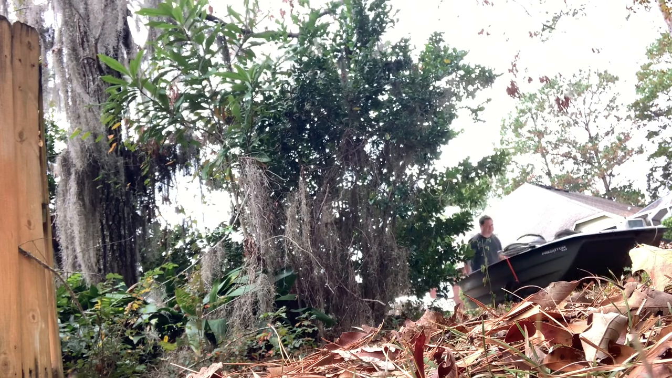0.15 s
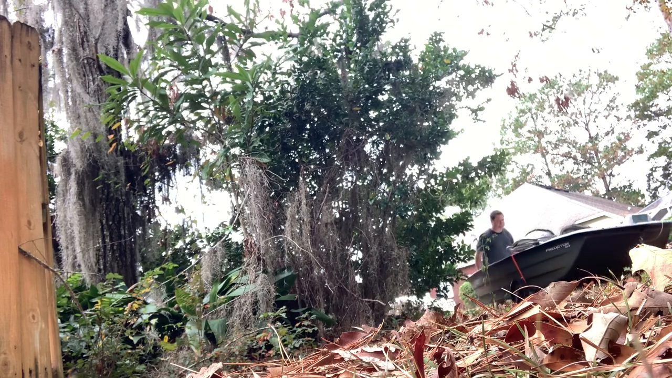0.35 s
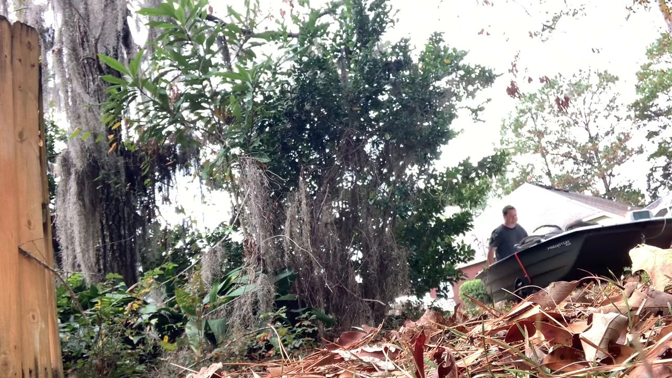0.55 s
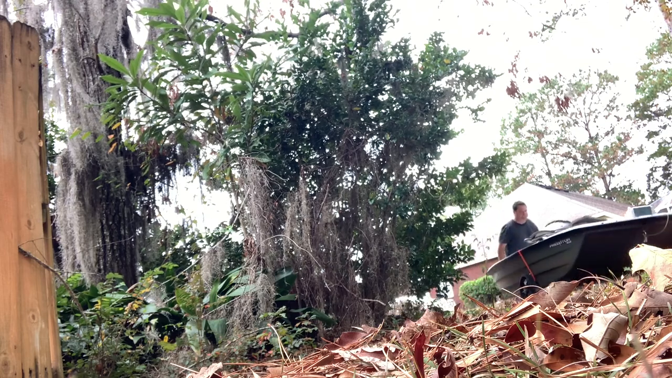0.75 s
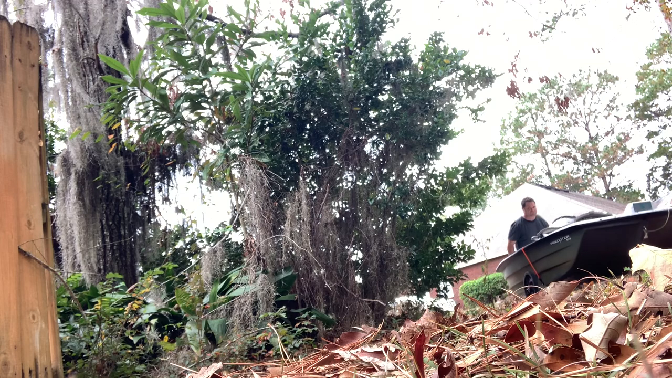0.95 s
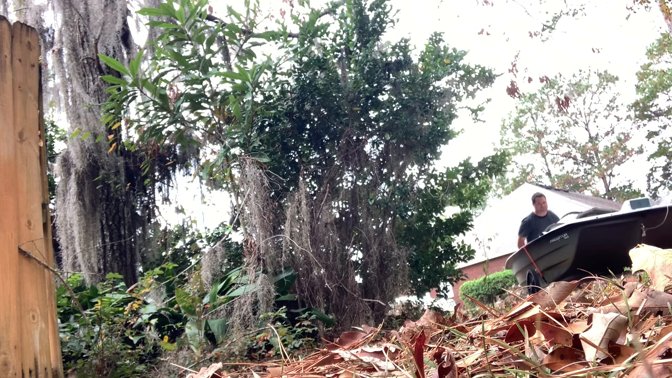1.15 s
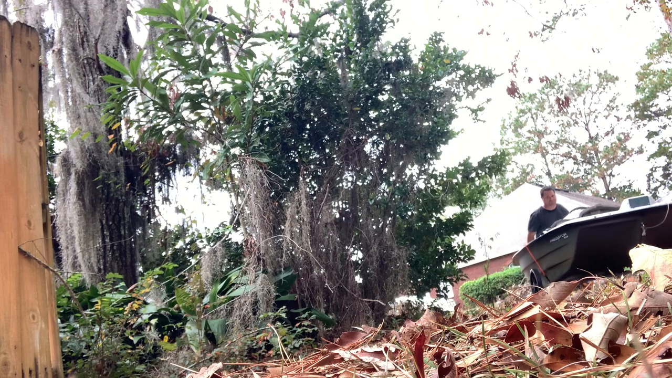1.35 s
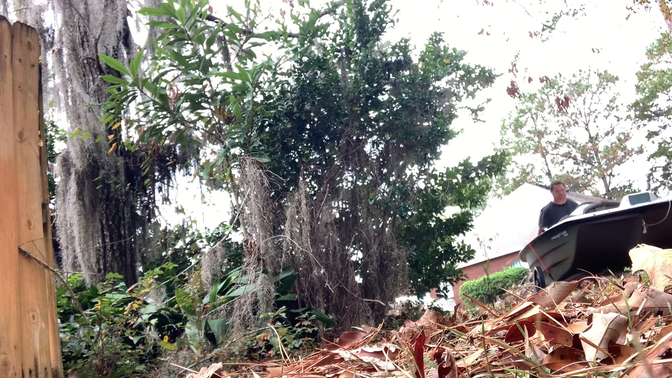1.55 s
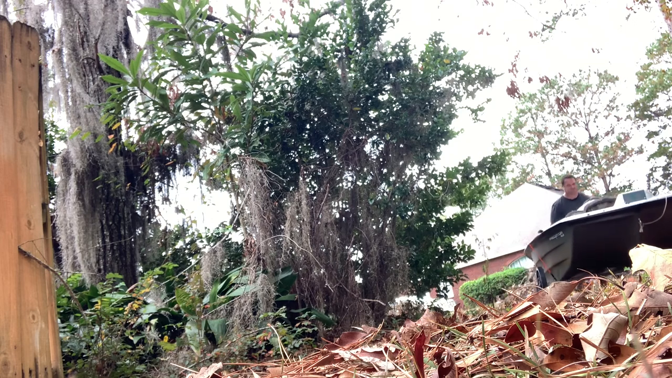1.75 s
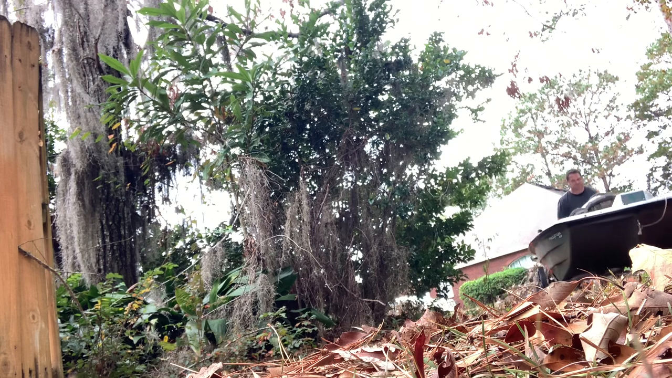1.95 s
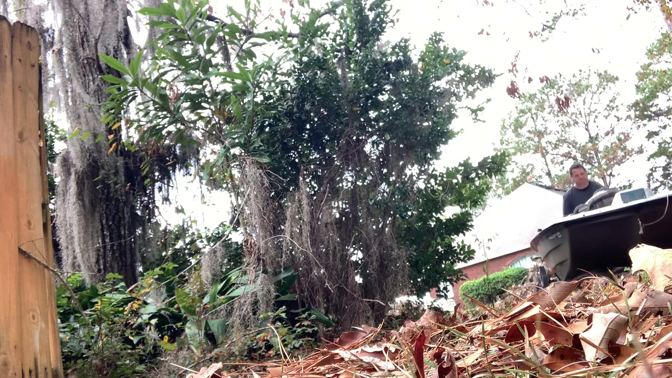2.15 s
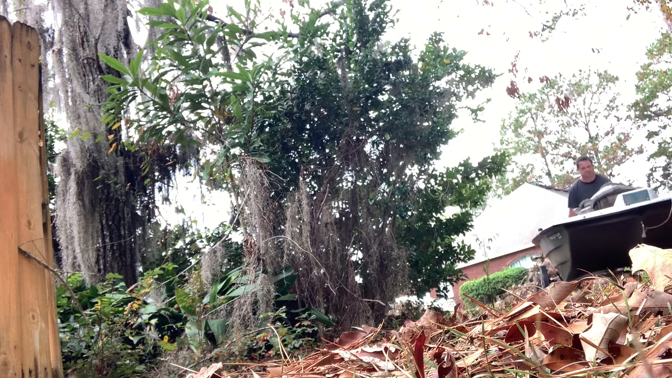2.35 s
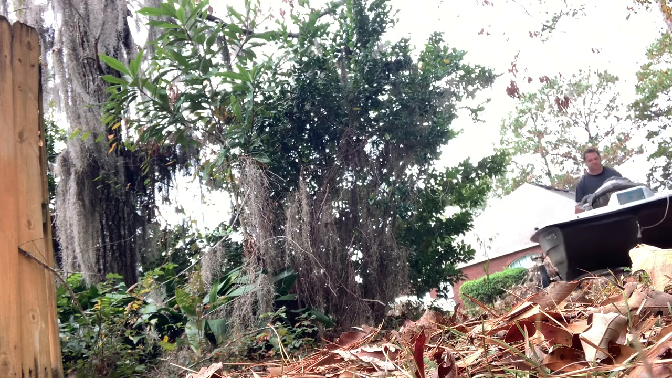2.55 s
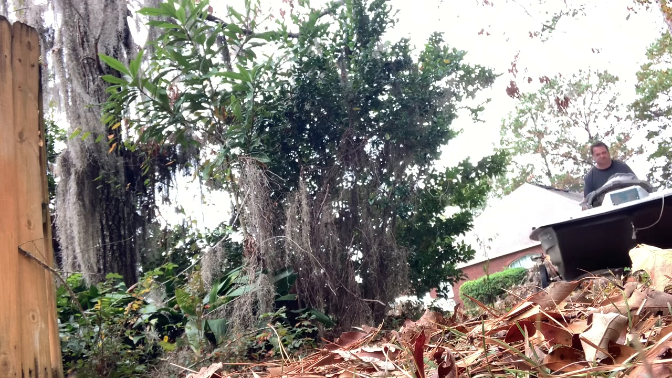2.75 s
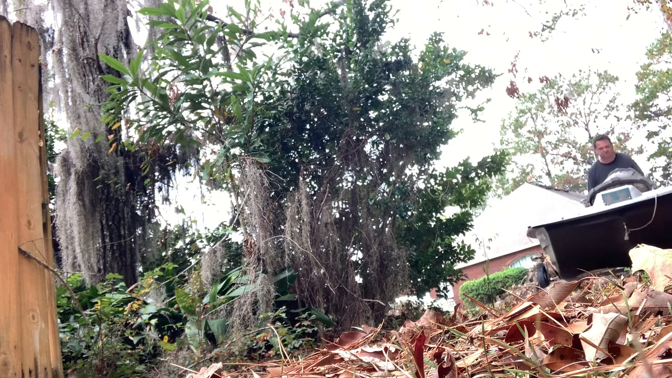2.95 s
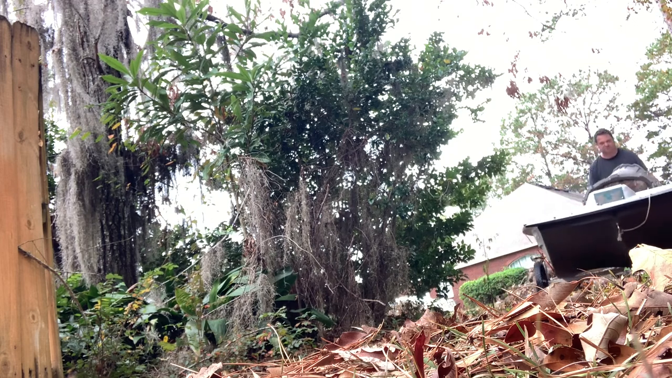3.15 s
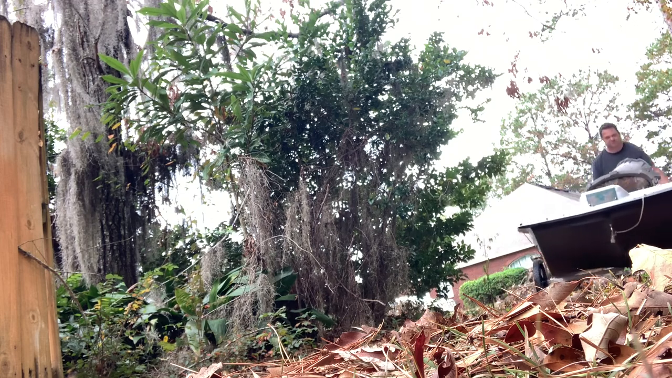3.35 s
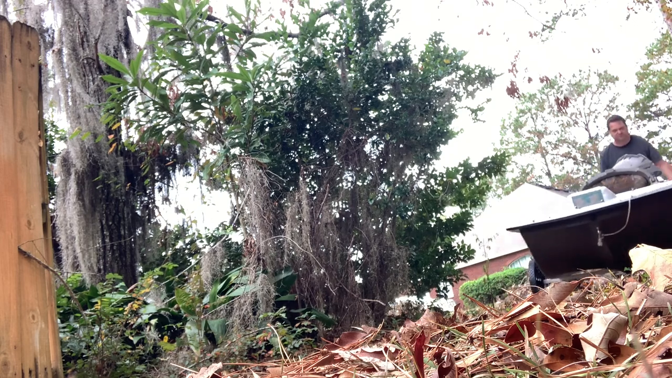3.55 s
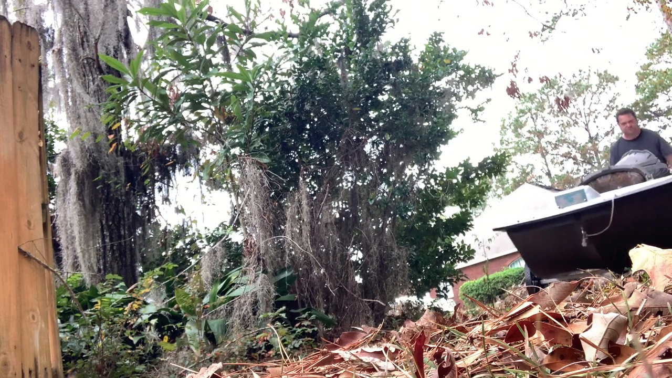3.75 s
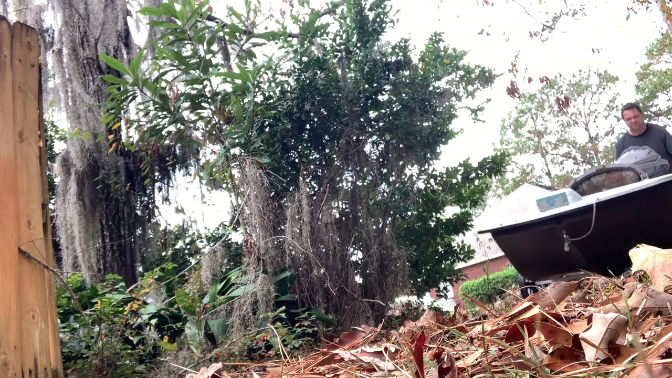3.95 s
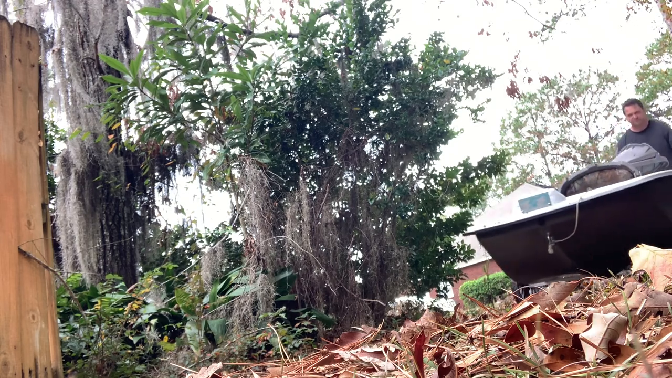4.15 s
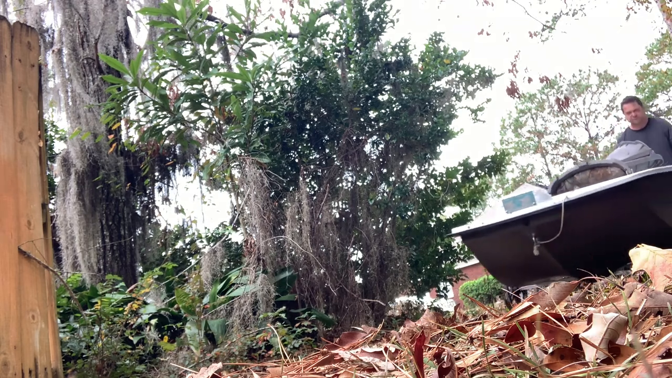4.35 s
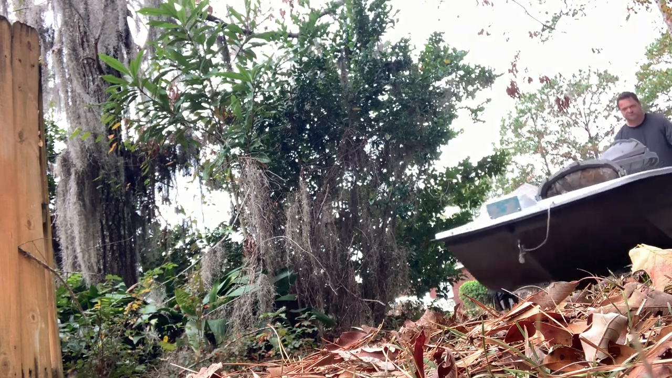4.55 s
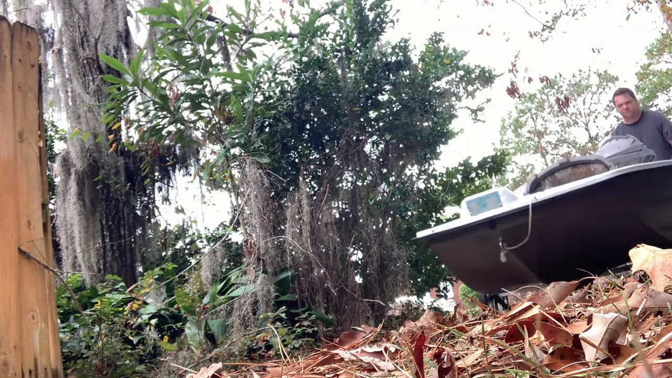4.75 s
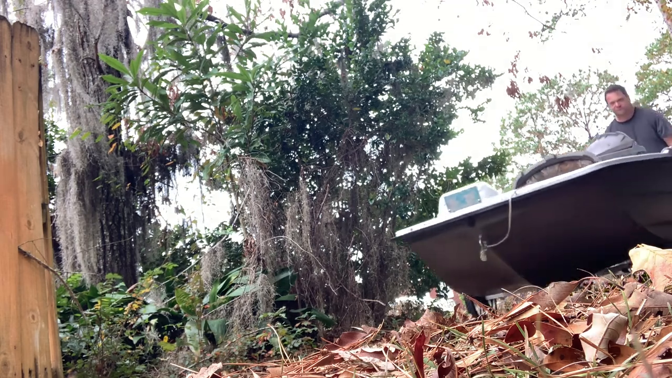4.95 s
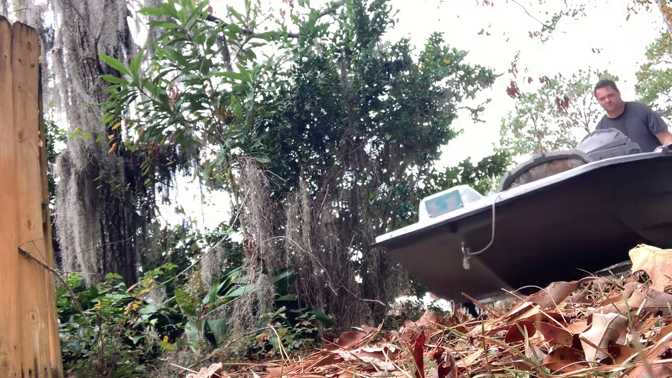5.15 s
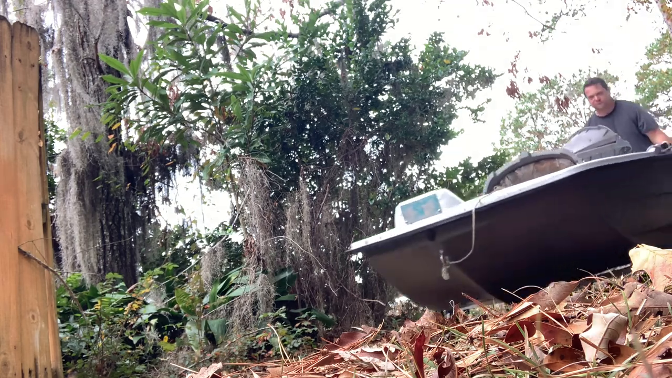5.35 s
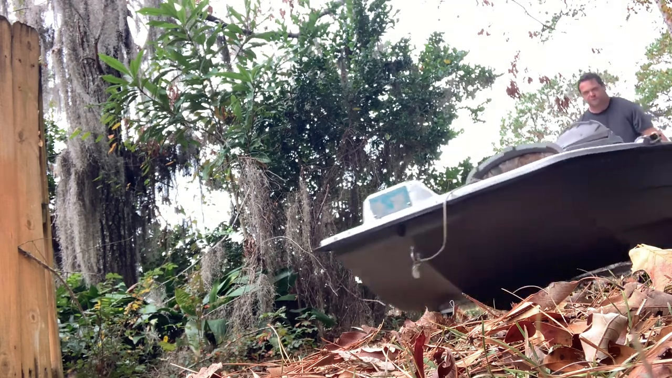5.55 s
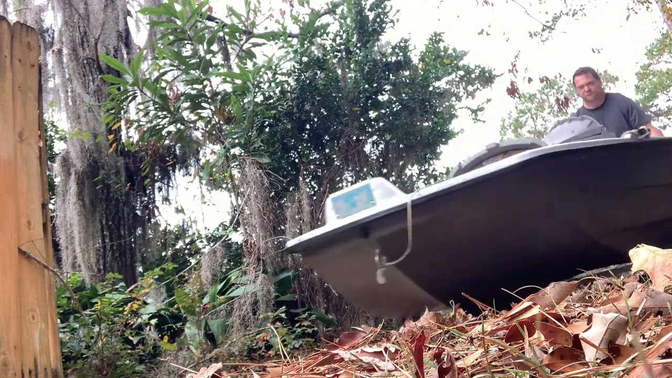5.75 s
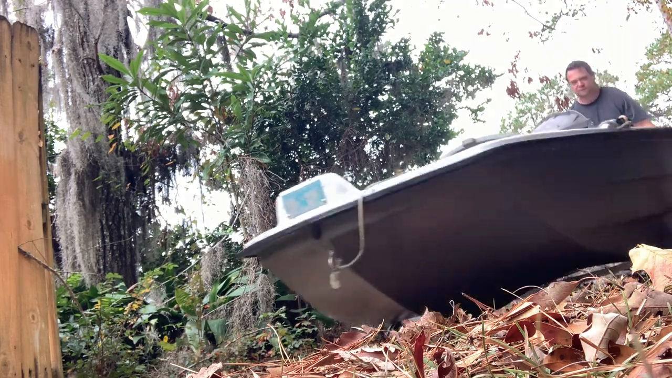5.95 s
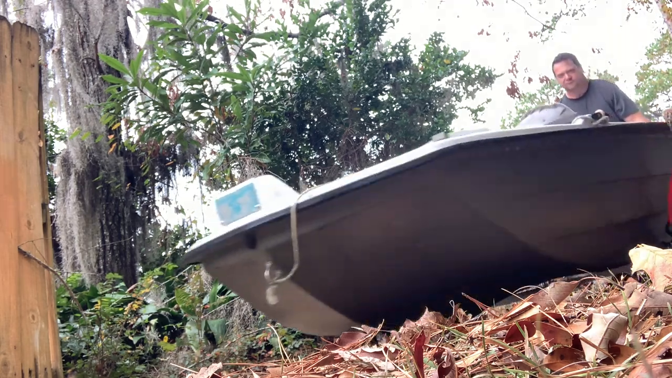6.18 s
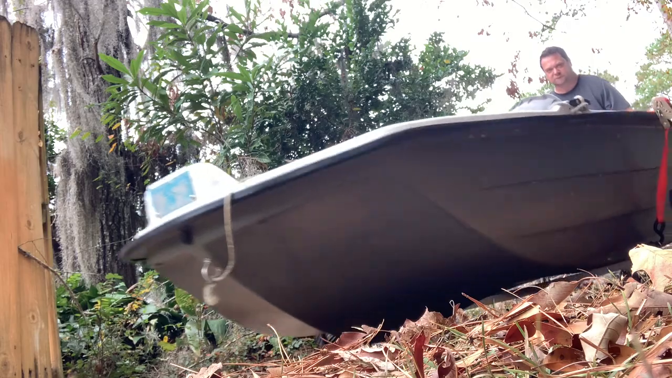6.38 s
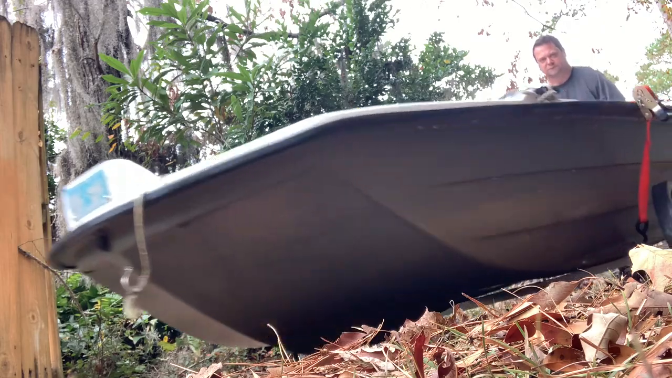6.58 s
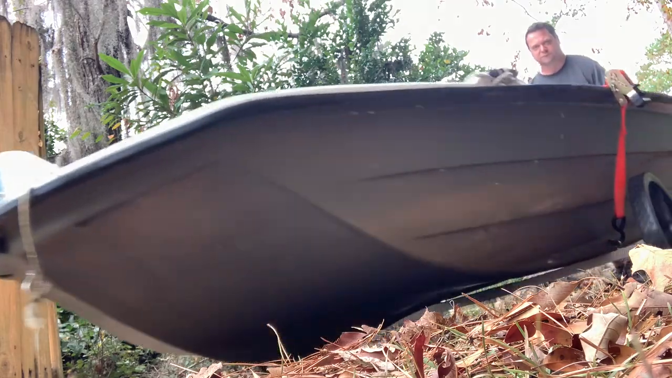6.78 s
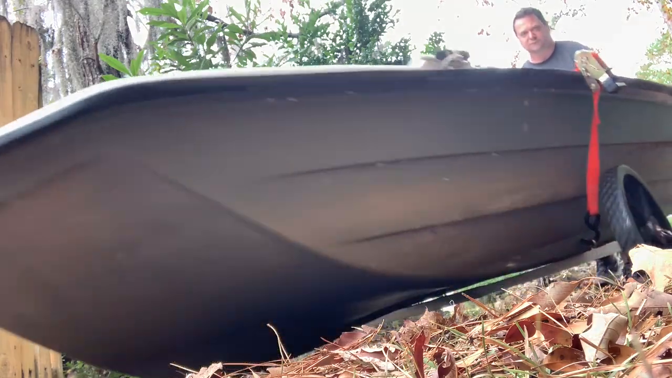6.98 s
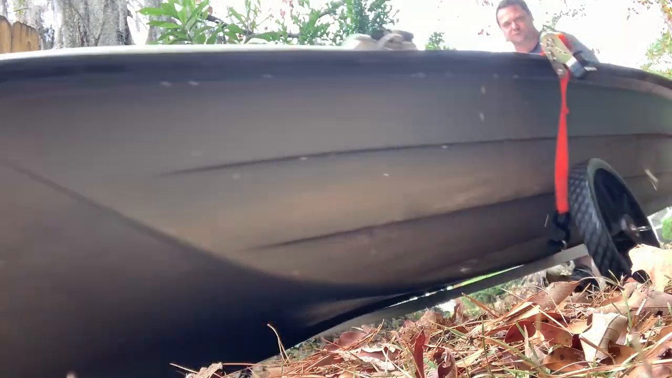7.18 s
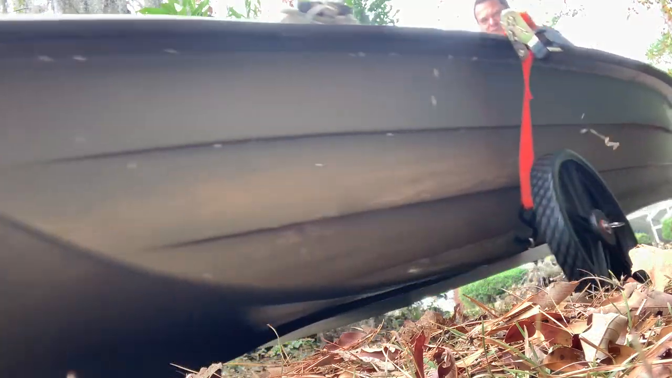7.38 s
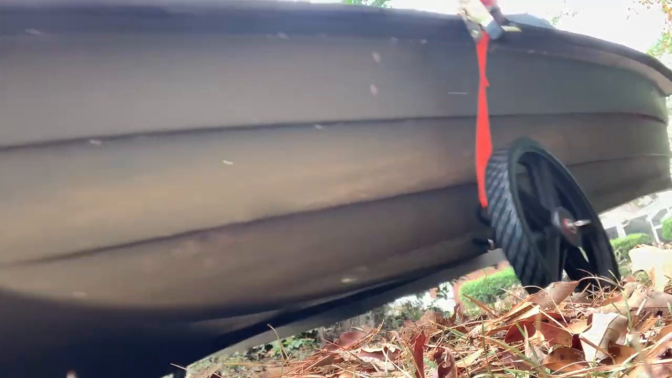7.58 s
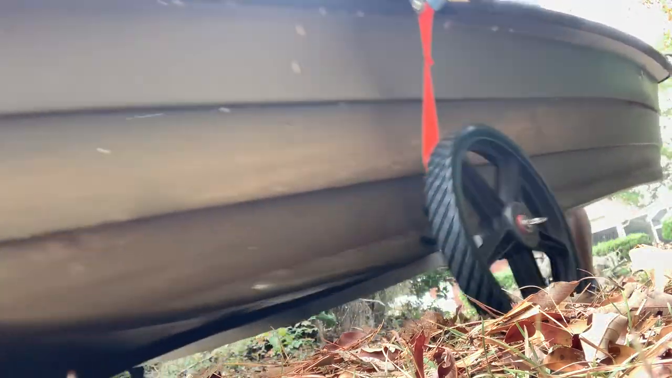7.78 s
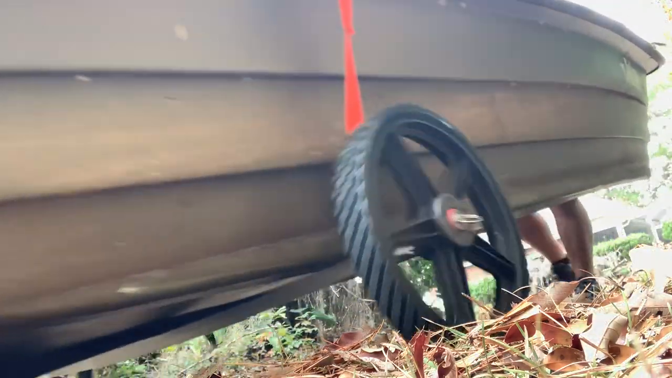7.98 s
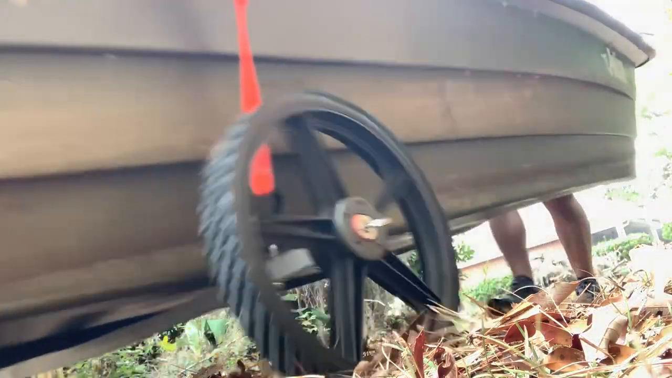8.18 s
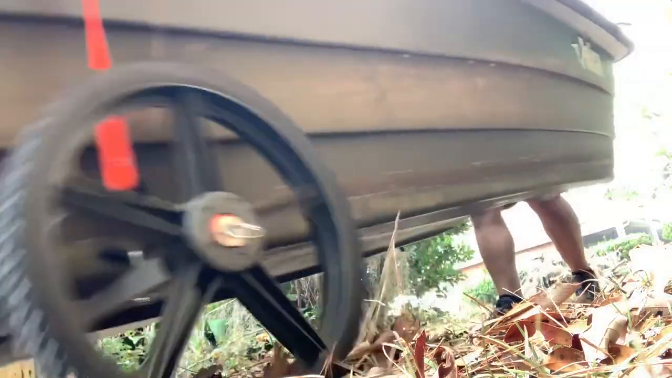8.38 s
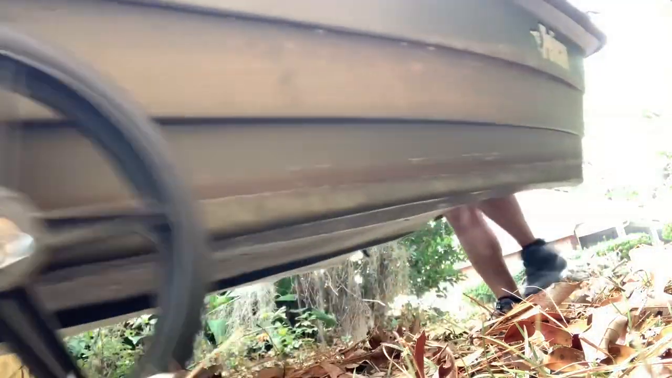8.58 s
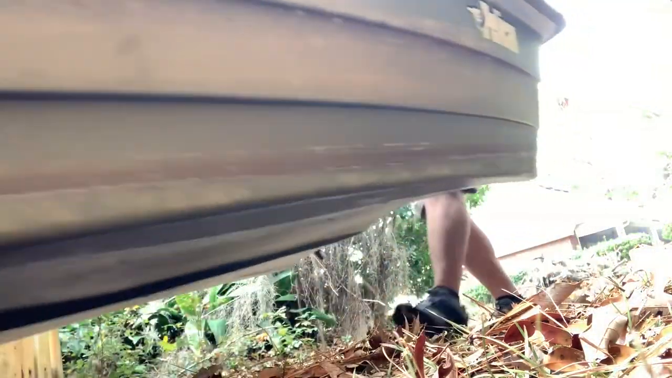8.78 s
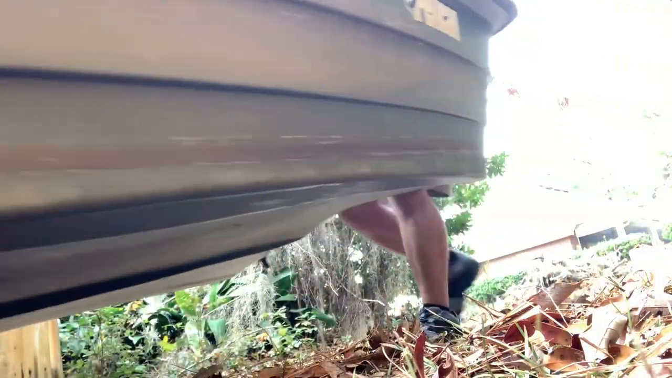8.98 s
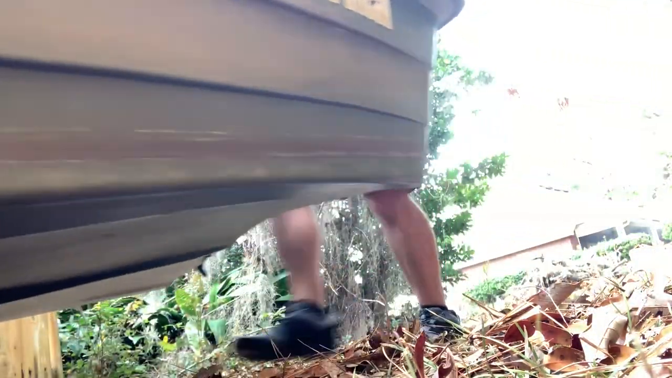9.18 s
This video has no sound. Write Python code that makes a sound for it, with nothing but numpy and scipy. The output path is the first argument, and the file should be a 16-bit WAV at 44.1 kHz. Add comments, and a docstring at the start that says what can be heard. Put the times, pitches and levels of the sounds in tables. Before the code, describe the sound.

Outdoor stereo sound from a microphone on the ground in a backyard, about nine seconds, with a faint low-pitched air background. From 0 to 2 s, distant, sparse leaf rustles and soft dull knocks, barely above the background. At about 2 to 2.8 s a rough patch brings a cluster of rattling knocks, crunches and hollow low booms, then it calms until 4 s. From 4 to 6 s the rolling draws nearer in uneven surges, with crisp crackles, small twig snaps and rumble. From 6 to 7.7 s knocks on the dolly frame grow firm, stalks snap clearly and the hull booms deeply. Between 7.8 and 8.7 s the wheel passes very close: dense loud crunching and sharp bright cracks. From 8.8 s to the end, hard knocks and the heaviest drum-like hull booms dominate as leaf crackle thins.

```python
"""In a backyard, a plastic boat on a two-wheeled dolly is pushed over dry leaves, from afar to right past a
microphone on the ground. Rolling noise, a leaf rustle and a hull rumble, grows unevenly as it nears.
Bursts of filtered noise make crushed leaves; short decaying sines and noise make snapping twigs.
Rough ground shakes the load, and bumps excite decaying modes: knocks in the dolly, booms in the hollow hull."""
import sys
import numpy as np
from scipy import signal
from scipy.fft import rfft, irfft, next_fast_len
from scipy.io import wavfile
from scipy.ndimage import uniform_filter1d

SR = 44100
rng = np.random.default_rng(int(sys.argv[2]) if len(sys.argv) > 2 else 0)


def unload_audio(sound):
    """Save the sound as a 16-bit wav file, at the path given as the first command line argument."""
    columns = np.transpose(np.atleast_2d(sound))
    # keep every value between -1 and 1, then stretch to whole-number steps
    steps = np.round(np.clip(columns, -1, 1) * 32767)
    wavfile.write(sys.argv[1], SR, steps.astype(np.int16))


N = 406602
TIME = np.arange(N) / SR
COARSE_TIME = TIME[::40]   # enough for slow envelopes
SIZE = next_fast_len(N + SR // 2, True) // 2 * 2   # transform length, with room for filter tails
FREQS = np.maximum(np.arange(SIZE // 2 + 1) * SR / SIZE, 1)

# Steady rolling. Each row: time in seconds, relative leaf rustle in dB, relative hull rumble in dB.
ROLLING_LEVELS = [(0, -69.5, -50), (1.3, -71, -53), (2.0, -61, -45.5), (3.0, -68, -52), (3.75, -67, -53.5),
                  (4.3, -60, -50.5), (5.05, -55.5, -52.5), (5.5, -58.5, -41.5), (6.1, -50, -42),
                  (6.9, -45.5, -47), (7.45, -54.5, -39.5), (8.0, -47.5, -39.5), (8.75, -44, -37.5),
                  (9.22, -52.5, -34)]
# Stretches of rough ground under the wheels. Each row: start in seconds, hold in seconds,
# relative hull rumble in dB, relative dolly rattle in dB.
ROUGH_STRETCHES = [(0.724, 0.14, -56, -61.5), (1.99, 0.56, -38.5, -57), (2.617, 0.078, -44, -52),
                   (2.768, 0.083, -49, -56.5), (4.029, 0.16, -44, -66), (4.514, 0.27, -40.5, -58),
                   (5.344, 0.14, -45, -54.5), (5.572, 0.3, -41, -52), (6.202, 0.4, -36.5, -49.5),
                   (6.533, 0.33, -44.5, -52.5), (7.094, 0.17, -36, -53), (7.507, 0.39, -36.5, -52.5),
                   (8.219, 0.06, -25.5, -60), (8.33, 0.32, -31, -55), (8.761, 0.52, -28.5, -46.5)]
# Spectrum of thin, brittle leaf matter. Each row: frequency in Hz, relative density in dB per Hz.
RUSTLE_SPECTRUM = [(2500, -15), (5000, -10.5), (7000, -3.5), (8000, -11), (8800, 2.5), (10500, -1),
                   (12500, -2), (14500, -14), (15800, -10)]
# Spectrum of breaking wood. Each row: frequency in Hz, relative density in dB per Hz.
TWIG_SPECTRUM = [(500, -25), (1100, -30), (1800, -4), (2450, -4), (3300, 9.5), (4300, 12.5), (5000, 1),
                 (6100, 2.5), (7300, 11), (10000, -9), (16000, -22)]
# Spectrum of the dull litter on the ground. Each row: frequency in Hz, relative density in dB per Hz.
LITTER_SPECTRUM = [(200, -27.5), (380, 6), (700, 8), (1000, 1), (1350, 2.5), (1900, -9.5), (3000, -21.5),
                   (6000, -14)]


def from_db(db):
    """Amplitude gain is ten to the power of a twentieth of the level in decibels."""
    return 10 ** (np.asarray(db) / 20)


def rms_one(x):
    """Normalization: division by the root mean square gives unit power."""
    return x / np.sqrt(np.mean(x ** 2) + 1e-20)


def in_time(rows):
    """Linear interpolation: each column of a breakpoint curve at every sample."""
    s, *columns = np.transpose(rows)
    return [np.interp(TIME, s, column) for column in columns]


def over_hz(points):
    """Linear interpolation of a table along a logarithmic frequency axis."""
    hz, values = np.transpose(points)
    return np.interp(np.log(FREQS), np.log(hz), values)


def drift(rate):
    """Random modulation of unit rms: `rate` values a second, joined by lines; the 4096th value then holds."""
    return rms_one(np.interp(TIME * rate, np.arange(4096), rng.standard_normal(4096)))


def fade(energy, t60):
    """Exponential decay: each impulse of energy falls by 60 dB in t60 seconds."""
    return signal.lfilter([1], [1, -from_db(-120 / (t60 * SR))], energy + 1e-24)


def noise_burst(energy, spectrum):
    """Modulated noise through a minimum-phase filter, with a partial coherence between two channels."""
    # Coherence of the channels. Each row: frequency in Hz, likeness from 0 to 1.
    likeness = [(60, 0.83), (200, 1), (310, 0.33), (420, 0.82), (700, 0.62), (1200, 0.041), (1900, 0.16),
                (2800, 0.057), (4200, 0.11), (6000, 0.015), (6900, 0.71), (7700, 1), (8500, 1),
                (10300, 0.8), (12600, 1), (15000, 0.98)]
    log_gain = np.log(rms_one(from_db(over_hz(spectrum))))
    # Folding the cepstrum onto positive times makes the filter causal.
    cepstrum = irfft(log_gain)[:SIZE // 2]
    causal = np.exp(2 * rfft(cepstrum, SIZE) - cepstrum[0])
    noise = np.sqrt(energy) * rng.standard_normal((2, N))
    mid, side = rfft(noise, SIZE) * causal
    alike = np.clip(over_hz(likeness), 0, 1)
    mid = mid * np.sqrt((1 + alike) / 2)
    side = side * np.sqrt((1 - alike) / 2)
    return irfft(np.array([mid + side, mid - side]))[:, :N]


def grains(per_s, spread_db, t60, tail_t60, tail_share):
    """Shot noise: energy, about 1 on average, of many random breaks, each with a scattered tail."""
    born = rng.random(N) < per_s / SR
    size_db = spread_db * np.minimum(rng.exponential(1, N), 4)
    sizes = born * from_db(size_db) ** 2
    crack, tail = fade(sizes, t60), fade(sizes, tail_t60)
    share = np.clip(tail_share, 0, 1)
    energy = (1 - share) * crack / crack.mean() + share * tail / tail.mean()
    return energy / (uniform_filter1d(energy, size=SR // 6) + 1e-6)


def cracks(times, level_db, crack_t60, tail_t60, tail_db):
    """Sudden release of strain: energy of an immediate break, then a fainter tail of splinters and scatter."""
    breaks = np.zeros(N)
    breaks[(times * SR).astype(int)] = from_db(level_db) ** 2
    splinters = from_db(1.4 * drift(600)) ** 2
    return fade(breaks, crack_t60) + from_db(tail_db) ** 2 * fade(breaks, tail_t60) * splinters


def swells(s, hold, level_db, attack_s, release_s, sag_db_per_s):
    """Addition of energies: overlapping events rise, hold while sagging a little, and die away."""
    since = COARSE_TIME - s[:, None]
    rise = np.clip(since / attack_s + .5, 0, 1)   # halfway up at the listed start
    sag_db = sag_db_per_s * (np.clip(since, 0, hold[:, None]) - hold[:, None] / 2)
    fall = np.exp(-np.maximum(since - hold[:, None], 0) / release_s)
    height = rise * fall * from_db(level_db[:, None] - sag_db)
    return np.interp(TIME, COARSE_TIME, np.sum(height ** 2, axis=0))


def ring(blows, hz, t60):
    """Damped resonance: a unit blow sets a decaying sine of starting height 1 ringing."""
    r, w = from_db(-60 / (t60 * SR)), 2 * np.pi * hz / SR
    return signal.lfilter([0, np.sin(w)], [1, -2 * r * np.cos(w), r * r], blows + 1e-18)


def strike(events, modes, focus_octaves, chance_db):
    """Modal excitation: each blow rings all modes of a body, favouring those near its own pitch."""
    s, peak_db, pitch = np.transpose(events)
    hz, mode_db, t60 = np.transpose(modes)
    octaves_off = np.log2(hz / pitch[:, None])
    nearness = 1 / (1 + (octaves_off / focus_octaves) ** 2)
    weights = nearness * from_db(mode_db + chance_db * rng.standard_normal(nearness.shape))
    weights *= (-1) ** np.arange(len(hz)) / np.linalg.norm(weights, axis=1, keepdims=True)
    out = np.zeros(N)
    for k in range(len(hz)):
        blows = np.zeros(N)
        blows[(s * SR).astype(int)] = from_db(peak_db) * weights[:, k]
        out += ring(blows, hz[k], t60[k])
    return out


def soften(x, cut_hz):
    """Contact filtering: a soft contact passes little treble."""
    return signal.sosfilt(signal.butter(2, cut_hz, fs=SR, output="sos"), x)


def stalls():
    """Rolling noise falls with speed: level in dB of a lull as the wheels slow before rough ground."""
    lead_s, width_s, depth_db = 0.055, 0.033, 5.5
    s = np.transpose(ROUGH_STRETCHES)[0] - lead_s
    lull = np.exp(-((COARSE_TIME - s[:, None]) / width_s) ** 2).sum(axis=0)
    return -depth_db * np.interp(TIME, COARSE_TIME, lull)


def yard():
    """Stationary noise: the open air keeps up a steady, mostly low-pitched background."""
    # Spectrum of the open air. Each row: frequency in Hz, relative density in dB per Hz.
    air_spectrum = [(22, -30), (31, -4), (41, 6), (60, -1.5), (90, 5), (150, -8.5), (220, -7), (320, -19),
                    (550, -23.5), (1000, -32), (2000, -43), (6000, -41.5), (10000, -44), (16000, -70)]
    return from_db(-48.5) * noise_burst(np.ones(N), air_spectrum)


def patches(x, per_s, depth_db, count=22):
    """Spectral modulation: narrow bands swell and sink on their own, as each crushed leaf has its colour."""
    spectrum, out = rfft(x, SIZE), 0
    band = np.interp(np.log(FREQS), np.log([900, 14000]), [0, count - 1])
    for k in range(count):
        share = np.maximum(1 - np.abs(band - k), 0)
        out = out + irfft(spectrum * share)[:, :N] * rms_one(from_db(depth_db * drift(per_s)))
    return out


def ticks(per_s, spread_db, low_hz, high_hz, count=40):
    """Impulsive resonance: stems tick at many pitches, each with its own delay between channels; rms 1."""
    out = np.zeros((2, N))
    cycles = 28   # periods in which a tick falls by 60 dB
    for hz in np.geomspace(low_hz, high_hz, count):
        times, size, sign = rng.random((3, 400))
        kept = np.arange(len(times)) < per_s * N / SR / count
        blows = np.zeros(N)
        gain = from_db(-spread_db * np.log(size + 0.023))
        blows[(times * N).astype(int)] = kept * np.sign(sign - .5) * gain
        tick = ring(blows * hz, hz, cycles / hz)
        out += [tick, np.roll(tick, rng.integers(-8, 9))]
    return rms_one(out)


def twigs(times, peak_db, pitch_hz, chance_db, count=3):
    """Modal vibration: each twig rings briefly at its own modes, struck again by every fibre that parts."""
    # Modes of a breaking twig. Each row: multiple of its pitch, relative level in dB.
    twig_modes = [(0.54, -7), (0.7, -10), (0.87, -3), (1, 0), (1.12, -3), (1.56, -12)]
    twig_t60_s, detune_octaves, fibre_gap_s, fibre_loss_db = .014, .04, .0012, 8
    ratio, mode_db = np.transpose(twig_modes)
    t = np.arange(SR // 25) / SR
    out = np.zeros((2, N + SR))
    for s, db, hz in zip(times, peak_db, pitch_hz):
        weights = from_db(mode_db + chance_db * rng.standard_normal((2, len(ratio))))
        weights /= np.linalg.norm(weights, axis=1, keepdims=True)
        modes_hz = hz * ratio * 2 ** (detune_octaves * rng.standard_normal(len(ratio)))
        sines = np.sin(2 * np.pi * modes_hz[:, None] * t)
        tone = weights @ sines * from_db(db - 60 * t / twig_t60_s)
        for k, early in enumerate(rng.random(count)):
            start = int((s + fibre_gap_s * k * (1 - early / 2)) * SR)
            out[:, start:start + len(t)] += tone * from_db(-fibre_loss_db * k)
    return out[:, :N]


def small_breaks(crunch_db):
    """Random fracture: stalks crack and bark pops at many pitches, at levels tied to the crunch around them."""
    per_s, spread_db = 30, 2.5
    stalk_low_hz, stalk_high_hz, bark_low_hz, bark_high_hz = 1800, 6500, 600, 1500
    when, size, depth, thinness = rng.random((int(per_s * N / SR), 4)).T
    s = when * TIME[-SR // 10]
    # They stand out close by, until the tyre's crunch covers them.
    over_db = np.interp(s, [4.5, 6.5, 8.0], [-4, 7, -9.5])
    level_db = np.interp(s, TIME, crunch_db) + over_db - spread_db * np.log(size + 0.55)
    crack = cracks(s, level_db - 6, crack_t60=.006, tail_t60=.06, tail_db=-20)
    # The litter below gives the dull part.
    thud_db = level_db + 3 + 6 * (depth - .5)
    thud = cracks(s, thud_db, crack_t60=.012, tail_t60=.06, tail_db=-20)
    stalk_hz = stalk_low_hz * (stalk_high_hz / stalk_low_hz) ** thinness
    stalks = twigs(s, level_db + 3.5, stalk_hz, chance_db=3)
    pop_db = np.interp(s, [7.3, 8.0], [3, -7])
    bark_hz = bark_high_hz * (bark_low_hz / bark_high_hz) ** depth
    bark = twigs(s, level_db + pop_db, bark_hz, chance_db=3)
    return noise_burst(crack, TWIG_SPECTRUM) + noise_burst(thud, LITTER_SPECTRUM) + stalks + bark


def leaves():
    """Fracture noise: thin leaf edges crackle finely and densely; ribs and stems crunch more sparsely."""
    # Heaps of leaves pressed by a foot or wheel. Each row: start in seconds, hold in seconds,
    # relative fine rustle in dB, relative coarse crunch in dB.
    crushes = [(0.055, 0.051, -63, -89), (0.32, 0.095, -61.5, -73), (0.683, 0.023, -55, -66),
               (0.73, 0.18, -57.5, -67.5), (0.947, 0.12, -68, -75), (1.161, 0.017, -57, -64),
               (1.352, 0.14, -62, -75), (1.537, 0.097, -55.5, -64.5), (1.967, 0.039, -59.5, -68),
               (2.054, 0.019, -47.5, -57.5), (2.206, 0.068, -53, -56), (2.277, 0.078, -59, -60),
               (2.468, 0.041, -52, -54), (2.656, 0.034, -54, -57), (2.774, 0.12, -86, -67),
               (2.93, 0.15, -63, -70.5), (3.215, 0.079, -55, -70), (3.417, 0.14, -67, -71),
               (3.794, 0.018, -61, -67.5), (4.05, 0.039, -52, -58), (4.132, 0.028, -48.5, -72),
               (4.357, 0.043, -55.5, -63.5), (4.53, 0.044, -53.5, -63), (5.163, 0.047, -53, -63.5),
               (5.292, 0.16, -53, -66), (5.589, 0.075, -47, -59.5), (5.802, 0.055, -46.5, -65),
               (5.997, 0.05, -50, -62), (6.18, 0.16, -46, -76), (6.46, 0.13, -44, -66),
               (6.686, 0.12, -47, -58), (6.951, 0.23, -47, -53.5), (7.392, 0.038, -55, -60.5),
               (7.706, 0.26, -46, -51.5), (7.863, 0.086, -36.5, -43), (8.068, 0.06, -41.5, -44),
               (8.167, 0.034, -37, -45.5), (8.327, 0.089, -43, -43), (8.526, 0.22, -41, -55),
               (8.91, 0.13, -63, -52.5)]
    # Spectrum of breaking ribs. Each row: frequency in Hz, relative density in dB per Hz.
    crunch_spectrum = [(600, 9), (1200, 2), (1800, 1), (2300, -2), (3300, 5.5), (4300, 6.5), (5000, -5.5),
                       (6200, 4), (7300, 4), (10000, -6.5), (16000, -31)]
    rolling_db = in_time(ROLLING_LEVELS)[0] + 0.5 * stalls()
    s, hold, fine_db, coarse_db = np.transpose(crushes)
    # A heap gives way, packs down and settles.
    shape = dict(attack_s=0.053, release_s=0.038, sag_db_per_s=12)
    below_db = np.linspace(-32, -5.5, N)   # rolling crunch against rolling rustle, far to near
    edges = from_db(rolling_db) ** 2 + swells(s, hold, fine_db, **shape)
    ribs = from_db(rolling_db + below_db) ** 2 + swells(s, hold, coarse_db, **shape)
    clumps_db = 2.0 * drift(45)   # leaves give way in clumps
    scattered = np.interp(TIME, [4.0, 8.0], [.65, .38])   # the crackle gets crisper as the wheels near
    fine = grains(per_s=2500, spread_db=2.5, t60=0.0013, tail_t60=0.071, tail_share=0.73)
    coarse = grains(per_s=170, spread_db=2.8, t60=0.010, tail_t60=0.25, tail_share=scattered)
    rustle_energy = (fine + 0.16 * coarse) * edges * from_db(clumps_db + 0.62) ** 2
    rustle = patches(noise_burst(rustle_energy, RUSTLE_SPECTRUM), per_s=50, depth_db=3.0)
    crunch_energy = coarse * ribs * from_db(clumps_db + 1.3) ** 2
    crunch = patches(noise_burst(crunch_energy, crunch_spectrum), per_s=70, depth_db=3.8)
    stem_ticks = ticks(per_s=170, spread_db=1.0, low_hz=1180, high_hz=6350)
    stems = np.sqrt(ribs) * from_db(-8.5) * stem_ticks
    return rustle + crunch + stems + small_breaks(10 * np.log10(ribs))


def snaps():
    """Brittle fracture: a twig cracks with a woody body and a brittle top; far ones scatter, near ones ring."""
    # Twigs and stiff leaves that break. Each row: time in seconds, relative body in dB,
    # relative brittle top in dB, pitch in Hz.
    snap_events = [(0.690, -62, -42.5, 4170), (1.576, -62, -51, 1670), (2.047, -53, -44, 5100),
                   (2.2315, -57, -41.5, 1380), (2.243, -57, -44, 6600), (2.405, -56, -57, 1340),
                   (2.487, -43, -46, 5500), (2.651, -44, -55, 4160), (4.0394, -57, -51, 4740),
                   (4.076, -47, -53, 5900), (4.548, -59, -51, 1590), (4.734, -47, -45.5, 6340),
                   (5.3406, -48, -34.5, 6100), (5.449, -58, -41.5, 5930), (5.5803, -48.5, -35.5, 1620),
                   (5.6344, -59, -35, 6700), (5.8302, -49.5, -50, 1830), (6.094, -55, -37, 1630),
                   (6.21, -45.5, -37, 1600), (6.2865, -61, -38, 6360), (6.3965, -59, -47, 3740),
                   (6.589, -41, -36, 2880), (6.8516, -50, -44, 3480), (6.894, -53, -41, 4260),
                   (6.984, -52, -31, 5540), (7.072, -50, -50, 4000), (7.1064, -40, -44, 3400),
                   (7.120, -39.5, -27.5, 3450), (7.296, -43, -36, 3350), (7.308, -57, -36.5, 1090),
                   (7.354, -54, -54, 1900), (7.426, -58, -43, 2420), (7.520, -47.5, -38.5, 3340),
                   (7.640, -49.5, -39, 5950), (7.683, -42.5, -51, 3700), (7.7374, -49, -52, 3350),
                   (7.828, -40, -50, 3420), (7.8373, -34, -27, 3780), (7.8393, -40.5, -29, 1540),
                   (7.8868, -37, -27, 1730), (7.908, -37, -32, 1850), (7.9188, -36, -28, 2750),
                   (7.9281, -35.5, -39, 2880), (7.9473, -34, -30, 3950), (8.004, -31, -21.5, 4000),
                   (8.088, -33.5, -27.5, 3440), (8.185, -50, -28, 6700), (8.2399, -26.5, -18.5, 3430),
                   (8.2399, -32.5, -18, 1910), (8.2817, -40.5, -31.5, 6400), (8.39, -42, -42, 3370),
                   (8.406, -39, -44, 3670), (8.42, -40.5, -32, 3440), (8.4953, -41.5, -32, 3450),
                   (8.5852, -21, -17.5, 6170), (8.6099, -27.5, -20, 3300), (8.626, -41, -23.5, 6150),
                   (8.8041, -41, -39, 5140), (8.939, -44, -34.5, 5070), (8.989, -48, -52, 4950),
                   (9.017, -45, -40, 4400)]
    s, body_db, top_db, pitch = np.transpose(snap_events)
    scatter_db = np.interp(TIME, [4.5, 8.0], [-9, -19])
    blur_db = np.interp(s, [4.5, 7.0], [2, 0])   # far snaps have more noise and less ring
    body = cracks(s, body_db + .5 + blur_db, crack_t60=.013, tail_t60=0.25, tail_db=scatter_db)
    top = cracks(s, top_db + 4.5, crack_t60=0.009, tail_t60=0.11, tail_db=scatter_db)
    wood = twigs(s, body_db + 7.5 - 2 * blur_db, pitch, chance_db=2)
    return noise_burst(body, TWIG_SPECTRUM) + noise_burst(top, RUSTLE_SPECTRUM) + wood


def knocks():
    """Impact: a wheel hits a root, the frame's modes ring, ring again on rebound, and litter is crushed."""
    # Wheels over roots and litter. Each row: time in seconds, relative peak in dB, pitch in Hz,
    # relative crush of the litter in dB.
    knock_events = [(0.384, -48, 470, -70), (0.512, -62, 930, -55), (0.701, -47, 450, -68),
                    (0.814, -48.5, 580, -52.5), (1.02, -62, 800, -57), (1.166, -48, 530, -56.5),
                    (1.573, -48, 540, -47.5), (2.002, -43.5, 410, -53), (2.022, -46, 524, -58),
                    (2.046, -41.5, 800, -53), (2.169, -45, 401, -49.5), (2.189, -43, 960, -47.5),
                    (2.231, -44, 587, -43), (2.303, -43, 560, -51), (2.405, -38, 730, -41.5),
                    (2.487, -44, 600, -50), (2.532, -47.5, 420, -65), (2.61, -46.5, 520, -55),
                    (2.65, -39.5, 500, -47), (2.685, -42.5, 586, -52), (2.803, -49.5, 373, -64),
                    (2.922, -50.5, 400, -61), (2.959, -47.5, 420, -62), (3.232, -43.5, 400, -57),
                    (3.472, -56, 910, -51.5), (3.828, -49.5, 366, -61), (3.967, -44, 395, -75),
                    (4.04, -46, 552, -48.5), (4.076, -45.5, 705, -49.5), (4.156, -53, 520, -52.5),
                    (4.528, -43, 413, -49.5), (4.554, -47, 1130, -46), (4.68, -51, 840, -64),
                    (4.732, -46, 590, -46.5), (4.803, -56, 900, -48), (4.912, -45.5, 940, -57),
                    (4.981, -52, 840, -56), (5.289, -47.5, 516, -53), (5.339, -36, 545, -39.5),
                    (5.371, -36, 705, -46), (5.581, -34.5, 450, -40.5), (5.59, -47, 516, -52),
                    (5.635, -45, 550, -39.5), (5.72, -43, 595, -60), (5.755, -40.5, 635, -66),
                    (5.822, -39, 650, -44), (5.91, -39, 910, -64), (5.998, -41, 620, -48),
                    (6.042, -29.5, 376, -55), (6.048, -42, 694, -44), (6.094, -39, 710, -50),
                    (6.194, -44, 385, -45), (6.214, -38.5, 810, -40), (6.269, -29.5, 650, -37.5),
                    (6.273, -34, 368, -54), (6.3183, -37.5, 910, -53), (6.349, -39, 517, -51),
                    (6.396, -33, 710, -52), (6.453, -36.5, 690, -42.5), (6.474, -38, 506, -45),
                    (6.588, -32.5, 860, -46), (6.659, -40, 900, -55), (6.73, -48, 850, -57),
                    (6.848, -45, 517, -62), (7.016, -35, 441, -55), (7.107, -40, 730, -34),
                    (7.148, -40, 895, -36.5), (7.315, -50, 850, -43), (7.365, -54, 1000, -49),
                    (7.521, -53, 520, -40.5), (7.592, -33.5, 415, -39), (7.736, -38.5, 500, -59),
                    (7.868, -35, 690, -41), (7.886, -33.5, 507, -47), (7.908, -36, 694, -31),
                    (7.9193, -33.5, 503, -33), (7.928, -28, 880, -40), (8.002, -34, 714, -44),
                    (8.192, -33.5, 570, -35), (8.237, -26.5, 830, -28), (8.39, -37.5, 453, -26),
                    (8.419, -38, 1330, -54), (8.61, -38, 505, -52), (8.795, -24.5, 380, -38),
                    (8.801, -24, 665, -32), (8.804, -35, 447, -40), (8.822, -45, 680, -35),
                    (8.84, -54, 520, -53), (8.944, -43, 450, -44), (9.048, -48, 890, -37),
                    (9.105, -48, 704, -63)]
    # Modes of the dolly frame. Each row: frequency in Hz, relative level in dB, 60 dB decay in seconds.
    dolly_modes = [(316, 7, 0.038), (380, 0, 0.14), (444.4, -2, 0.087), (519.6, -9.5, 0.19),
                   (563.3, -2, 0.074), (691, 6.5, 0.025), (822, 3, 0.026), (892, 2, 0.027),
                   (1010, 5, 0.011), (1380, -6, 0.054), (1670, -15, 0.028)]
    s, peak_db, pitch, crush_db = np.transpose(knock_events)
    scatter_db = np.interp(TIME, [4.5, 8.0], [-2, -10])
    hit_db = peak_db + 5
    first = np.transpose([s, hit_db, pitch])
    # The tyre tread makes a second contact about 7 ms later, 8 dB weaker.
    rebound_s = s + .007 * rng.uniform(.6, 1.4, len(s))
    rebound = np.transpose([rebound_s, hit_db - 8, pitch])
    frame = strike(np.vstack([first, rebound]), dolly_modes, focus_octaves=0.28, chance_db=3.0)
    crush = cracks(s, crush_db + 1, crack_t60=.016, tail_t60=.1, tail_db=scatter_db)
    return soften(frame, cut_hz=1750) + noise_burst(crush, LITTER_SPECTRUM)


def shaking_load():
    """Random excitation: small jolts keep hull and dolly shaking, more so on rough ground."""
    # Spectrum of the hull rumble. Each row: frequency in Hz, relative density in dB per Hz.
    rumble_spectrum = [(20, -75.5), (32, -25), (45, -0.5), (65, -1.5), (95, 1), (140, 1.5), (205, -4.5),
                       (300, -13), (400, -18), (550, -34), (1000, -50.5), (3000, -61)]
    # Spectrum of the dolly rattle. Each row: frequency in Hz, relative density in dB per Hz.
    rattle_spectrum = [(200, -22), (380, 2.5), (520, 2), (680, -1), (900, -10), (1200, -15), (1800, -20),
                       (4000, -25)]
    rolling_db = in_time(ROLLING_LEVELS)[1]
    s, hold, rumble_db, rattle_db = np.transpose(ROUGH_STRETCHES)
    shape = dict(attack_s=0.01, release_s=0.023, sag_db_per_s=2)
    pace = from_db(stalls()) ** 2
    hull = pace * (from_db(rolling_db) ** 2 + swells(s, hold, rumble_db, **shape))
    # On steady ground the rattle lies 16.5 dB below the rumble.
    frame = pace * (from_db(rolling_db - 16.5) ** 2 + swells(s, hold, rattle_db, **shape))
    jolts = grains(per_s=140, spread_db=0.0, t60=0.04, tail_t60=0.11, tail_share=0.54)
    chatter = grains(per_s=70, spread_db=1.5, t60=0.023, tail_t60=0.13, tail_share=1.0)
    rumble = noise_burst(jolts * hull * from_db(0.4) ** 2, rumble_spectrum)
    return rumble + noise_burst(chatter * frame, rattle_spectrum)


def hull_booms():
    """Resonance of a hollow body: big bumps set the low modes of the hull booming."""
    # Bumps under the hull. Each row: time in seconds, relative peak in dB, pitch in Hz.
    bumps = [(0.485, -34.5, 187), (0.84, -29, 140), (1.59, -32, 131), (1.996, -26.5, 75),
             (2.004, -26.5, 175), (2.024, -30, 184), (2.056, -29, 156), (2.118, -43, 240), (2.19, -31, 184),
             (2.232, -17.5, 104), (2.246, -26.5, 190), (2.275, -23.5, 140), (2.404, -29.5, 242),
             (2.432, -31, 179), (2.498, -34.5, 203), (2.652, -39, 167), (2.656, -24, 91),
             (2.759, -29.5, 179), (2.958, -33.5, 130), (3.235, -35.5, 210), (3.65, -35, 198),
             (3.884, -32.5, 190), (4.05, -27, 109), (4.533, -35, 83), (4.575, -29, 188), (4.733, -29.5, 89),
             (5.452, -27, 157), (5.721, -19.5, 182), (6.04, -30, 109), (6.268, -23.5, 187), (6.6, -20, 123),
             (7.008, -26, 135), (7.119, -13, 124.6), (7.3, -26, 159), (7.514, -23, 100), (7.594, -17, 145),
             (7.76, -17.5, 111), (7.861, -20.5, 201), (7.95, -13, 111), (8.208, -18, 198),
             (8.25, -16.5, 109), (8.347, -15.5, 91), (8.489, -19.5, 82.6), (8.59, -15, 99),
             (8.8, -12.5, 210), (8.812, -11.5, 85.5), (8.939, -12.5, 92), (9.045, -12.5, 198),
             (9.063, -9, 76), (9.175, -12.5, 92)]
    # Modes of the hull. Each row: frequency in Hz, relative level in dB, 60 dB decay in seconds.
    hull_modes = [(70.6, 0, 0.25), (96.3, 0, 0.31), (117.5, 3, 0.057), (140.6, 3, 0.19), (180, -11, 0.26),
                  (193.2, -2, 0.12), (225.7, -1.5, 0.26), (271, 4.5, 0.077), (396, -35, 0.13)]
    booms = strike(bumps, hull_modes, focus_octaves=0.2, chance_db=4.0)
    return from_db(-1.5) * soften(booms, cut_hz=500)


def scene():
    """Superposition: the pressures of the yard, leaves, twigs, dolly and hull add."""
    return yard() + leaves() + snaps() + knocks() + shaking_load() + hull_booms()


def record(dry):
    """Interchannel differences: two microphone ports differ in level and phase; deep bass and top are cut."""
    # Balance of the ports. Each row: frequency in Hz, left minus right in dB.
    balance = [(50, -6.5), (92, -3), (140, -8.5), (210, -11), (330, -13.5), (500, -7), (770, -0.5),
               (1200, -3.5), (1800, 0), (6000, -0.5)]
    # Phase between the ports. Each row: frequency in Hz, lead of the left in radians.
    port_phase = [(40, -0.8), (120, -0.84), (270, -1.5), (380, 1.62), (720, 1.44), (1150, -0.3),
                  (1800, -1.5), (2300, 1), (3000, 1.46), (4100, 0.5), (5200, 0), (6500, -2.35),
                  (7400, -3.5), (7900, -3.5), (8600, -3), (10000, -4), (11900, -6.5), (13000, -4.5),
                  (15500, -9)]
    dry = signal.sosfilt(signal.butter(2, 32, "high", fs=SR, output="sos"), dry)
    ratio = from_db(over_hz(balance))
    left = ratio * np.exp(1j * over_hz(port_phase))
    ports = np.array([left, np.ones_like(ratio)]) * np.sqrt(2 / (1 + ratio ** 2))
    low_pass = 1 / np.sqrt(1 + (FREQS / 15850) ** 240)   # steep cut at 15850 Hz
    return irfft(rfft(dry, SIZE) * ports * low_pass)[:, :N]


dry = scene()
out = record(dry)
unload_audio(out)
```